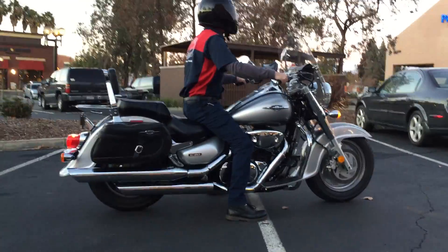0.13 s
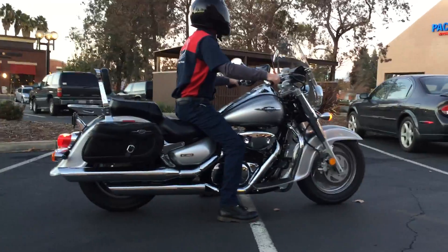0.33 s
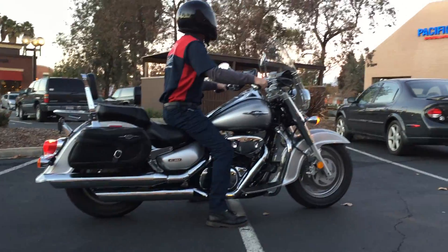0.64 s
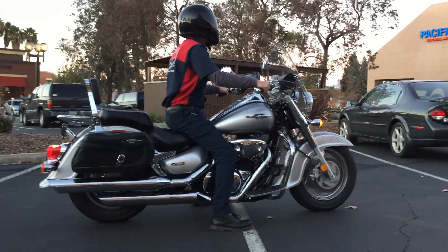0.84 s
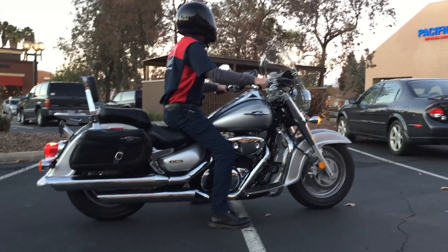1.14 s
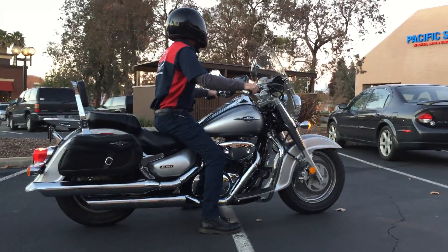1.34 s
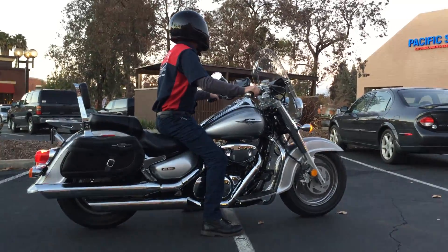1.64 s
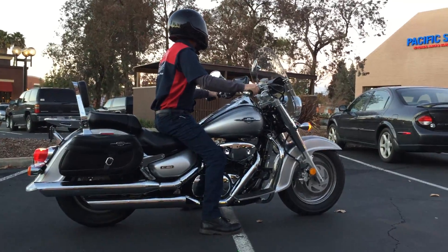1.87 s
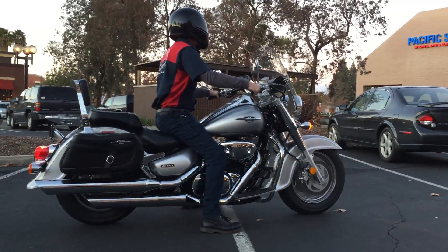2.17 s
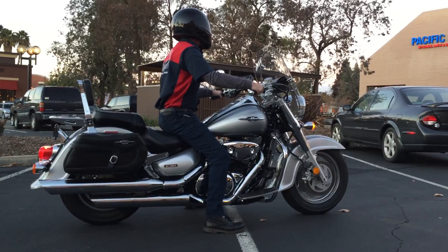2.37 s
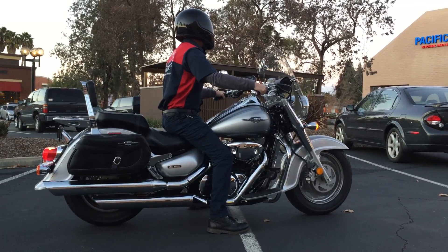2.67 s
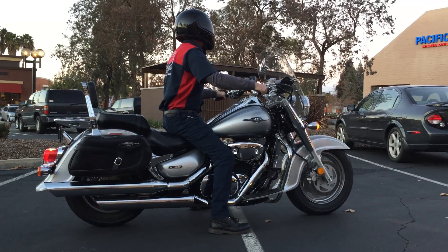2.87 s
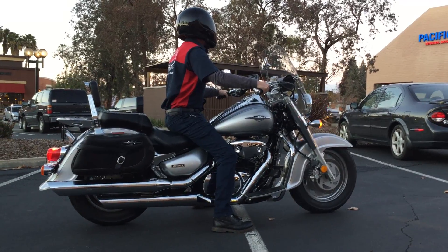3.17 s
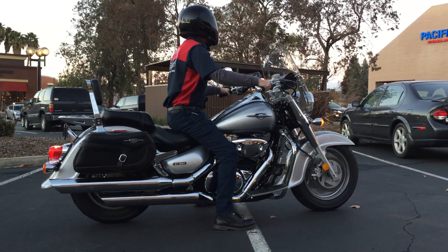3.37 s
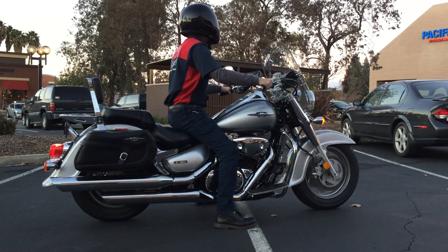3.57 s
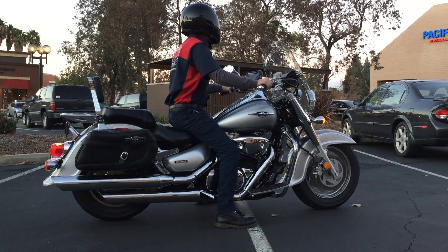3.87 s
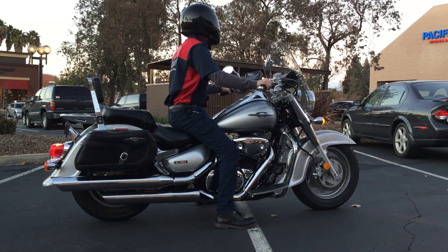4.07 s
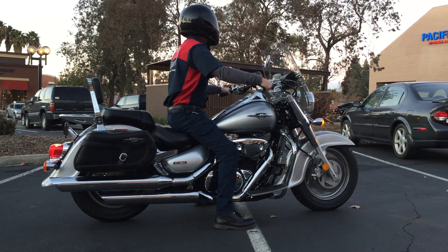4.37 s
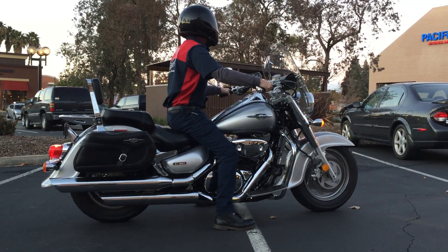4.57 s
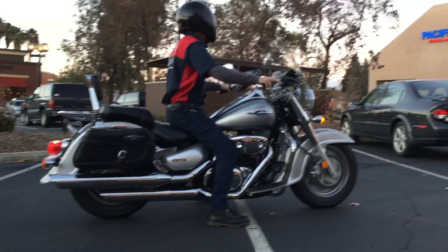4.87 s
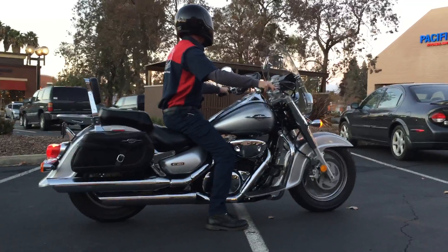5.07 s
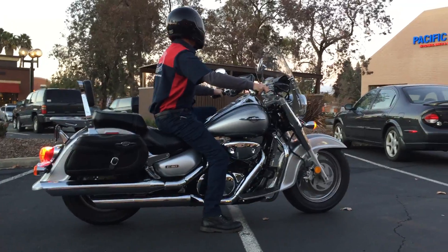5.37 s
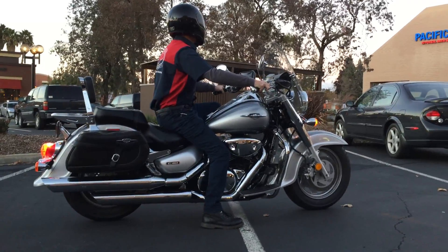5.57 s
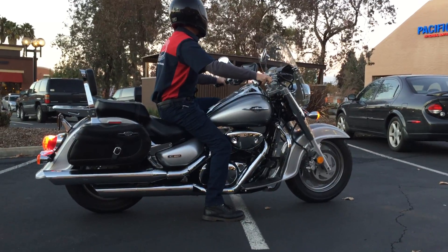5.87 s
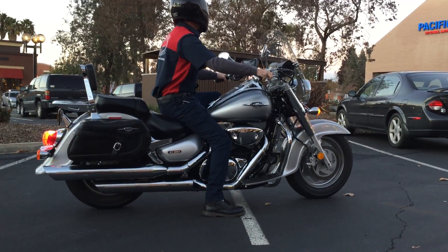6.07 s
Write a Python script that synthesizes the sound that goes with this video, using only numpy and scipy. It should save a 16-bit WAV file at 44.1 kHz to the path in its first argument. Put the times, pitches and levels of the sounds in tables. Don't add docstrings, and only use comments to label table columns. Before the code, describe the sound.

A big two-cylinder motorcycle idles with a deep uneven thump, then roars through two quick throttle blips, sputtering back down to idle in an open car park.

```python
import sys
import numpy as np
from scipy import signal
from scipy.fft import rfft, irfft
from scipy.io import wavfile
from scipy.ndimage import uniform_filter1d

SR = 44100
rng = np.random.default_rng(int(sys.argv[2]) if len(sys.argv) > 2 else 0)


def gain_from_decibels(decibels):
    exponent = np.asarray(decibels, float) / 20
    return 10 ** exponent


def store_pcm(level_fs):
    pcm = np.round(np.clip(level_fs, -1, 1) * 32767).astype(np.int16)
    wavfile.write(sys.argv[1], SR, np.atleast_2d(pcm).T)


N = 273861
T = np.arange(N) / SR
IDLE_HZ = 13.26


def unit(x):
    return x / np.sqrt(np.mean(x ** 2))


def ring(x, hz, t60):
    pole = np.exp(2j * np.pi * hz / SR - np.log(1000) / (t60 * SR))
    return signal.lfilter([1], [1, -pole], x).imag


def fade(x, t60):
    tail = signal.lfilter([1], [1, -np.exp(-np.log(1000) / (t60 * SR))], x)
    return uniform_filter1d(tail, size=300)


def coloured(points):
    hz, db = np.transpose(points)
    f = np.arange(N // 2 + 1) * SR / N + 1
    shape = gain_from_decibels(np.interp(np.log(f), np.log(hz), db))
    return unit(irfft(rfft(rng.standard_normal(N)) * shape, N))


def walk(rate):
    hold = int(SR / rate)
    steps = np.repeat(rng.standard_normal(N // hold + 1), hold)
    return unit(uniform_filter1d(uniform_filter1d(steps, hold), hold)[:N])


def clicks(s, size):
    inside = (s > 0) * (s < T[-1])
    return np.bincount(np.clip((s * SR).astype(int), 0, N - 1), size * inside, N)


def strokes(turns, at, scatter_db, jitter=0.005):
    late, strong = rng.standard_normal((2, 128))
    s = np.interp(np.arange(128) + at + jitter * late, turns, T, left=-1, right=99)
    return s, gain_from_decibels(scatter_db * strong)


# (time [s], four-stroke cycles per second [Hz])
ENGINE_SPEED = [(0, 12.606), (.31, 12.668), (.75, 13.246), (1.45, 12.905), (1.67, 13.669), (1.75, 16.336),
                (1.99, 34.604), (2.07, 32.754), (2.62, 18.051), (2.9, 15.018), (3.13, 14.163),
                (3.92, 13.68), (4.0, 16.276), (4.23, 36.073), (4.31, 36.564), (4.82, 21.905), (5.3, 14.562),
                (6.21, 13.668)]


def engine_speed():
    s, hz = np.transpose(ENGINE_SPEED)
    return np.interp(T, s, hz)


# (opens [s], eases [s], shut [s], load level [dB], intake roar level [dB])
BLIPS = [
    (1.639, 1.994, 2.05, 4, -31.5),
    (3.902, 4.195, 4.34, 5, -28.5),
]


def throttle():
    open_s, shut_s = 0.17, 0.041
    fill = np.array([np.interp(T, [a, a + open_s, b, c], [0, 1, 1, 0]) for a, b, c, _, _ in BLIPS])
    progress = sum(np.interp(T, [a, c - shut_s, c], [0, 1, 0]) for a, b, c, _, _ in BLIPS)
    load_db, roar_db = np.transpose(BLIPS)[3:]
    return fill.sum(axis=0), progress, gain_from_decibels(load_db) @ fill, gain_from_decibels(roar_db) @ fill ** 2.25


def strengths(speed, fill, load):
    relight_hz, relight_width_hz = 22.8, .7
    hot_hz, pump_full_hz = 18, 25
    excess = speed - relight_hz + (relight_hz - hot_hz) * fill
    lit = 1 / (1 + np.exp(excess / relight_width_hz))
    overrun = np.clip((speed - IDLE_HZ) / (pump_full_hz - IDLE_HZ), 0, 1)
    pump = overrun ** 0.86 * (1 - fill) ** 1.8
    idle = gain_from_decibels(1.5 + 9 * fill) * lit * (1 - 0.69 * pump)
    return np.array([idle, load, gain_from_decibels(-0.54) * pump * (1 - .55 * lit)])


# (frequency [Hz], density [dB per Hz])
TOWN_SPECTRUM = [(15, -18), (30, -16), (60, -29), (120, -19), (300, -33), (510, 3.5), (675, -9.5),
                 (1470, 0.5), (1850, -9), (2540, -17.5), (3590, -4), (5170, -22.5), (6310, -17),
                 (15700, -58)]


def town():
    return gain_from_decibels(-44 + walk(.7)) * coloured(TOWN_SPECTRUM)


# (frequency [Hz], bandwidth [Hz], level [dB])
CASE_MODES = [(393, 66, -9), (530, 93, -5), (710, 40, -22), (975, 86, -8.5), (1098, 53, -12.5),
              (1352, 58, -5), (1571, 35, 0), (1722, 94, -1.5), (1875.5, 32.4, 6.5), (2214, 48, -7),
              (2740, 6, -8.5), (3162, 44, -6), (3533, 213, -8.5), (3966, 133, -8), (4440, 250, -15),
              (6200, 420, -24.5), (7100, 400, -26)]
# (point in the cycle [cycles], level [dB])
VALVES = [
    (.05, -8),
    (.28, -6),
    (.52, -2),
    (.66, -8),
    (.87, 3),
]
# (time [s], level [dB])
SLACK = [
    (3.966, 13),
    (1.72, 2),
]


def cases(cycles):
    knocks = sum(gain_from_decibels(db) * clicks(*strokes(cycles, at, 2, jitter=.01)) for at, db in VALVES)
    s, slack_db = np.transpose(SLACK)
    chatter = .52 + fade(knocks + clicks(s, gain_from_decibels(slack_db)), .07)
    out = 0
    for hz, width, db in CASE_MODES:
        sharp = chatter ** (1 + .5 * (hz > 3000))
        mode = unit(ring(sharp * rng.standard_normal(N), hz, 2.4 / width))
        out = out + gain_from_decibels(db + .6 * walk(14)) * np.sqrt(width) * mode
    return unit(out)


# (frequency [Hz], density [dB per Hz])
GAS_SPECTRUM = [(190, -1), (330, -3.5), (650, -9.5), (717, -2.5), (802, -12.5), (943, -4), (1020, -12.5),
                (1830, -5.5), (2050, -10.5), (2610, -17.5), (3170, -12.5), (4100, -12.5), (5060, -16.5),
                (5950, -15.5), (15700, -24.5)]
# (time [s], peak level [dB], t60 [s])
SPITS = [(2.4543, -24, 0.06), (2.473, -27.5, 0.14), (2.5202, -23.5, 0.046), (2.5494, -27, 0.15),
         (2.605, -21, 0.047), (2.6244, -29, 0.055), (2.6823, -28, 0.054), (2.7921, -29, 0.072),
         (2.8484, -43, 0.06), (2.9294, -31, 0.074), (2.9811, -37, 0.05), (3.0694, -37, 0.06),
         (4.733, -26, 0.054), (4.8479, -31, 0.055), (4.8683, -26, 0.058), (4.915, -24.5, 0.058),
         (5.02, -25.5, 0.056), (5.074, -27, 0.06), (5.19, -27.5, 0.081), (5.2494, -42, 0.06),
         (5.3194, -30, 0.079)]


def gas(cycles, hiss_db, growl_db):
    puffs = sum(clicks(*strokes(cycles, at, 1.8, jitter=0.078)) for at in (.55, .85))
    flow = unit(.9 + fade(puffs, .06)) * gain_from_decibels(hiss_db + 7 + .7 * walk(25))
    spits = sum(fade(clicks(np.array([s]), gain_from_decibels([db - 4])), t60) for s, db, t60 in SPITS)
    size = np.sqrt(flow ** 2 + spits ** 2)
    noise = coloured(GAS_SPECTRUM)
    top = signal.sosfiltfilt(signal.butter(2, 11900, "high", fs=SR, output="sos"), noise)
    low = signal.sosfiltfilt(signal.butter(2, 990, fs=SR, output="sos"), noise)
    brightness = (size / gain_from_decibels(-24)) ** 0.08
    return size * (noise + low * (gain_from_decibels(growl_db) - 1) + top * (brightness - 1))


# (frequency [Hz], t60 [s], signed share of first cylinder, of second)
LOAD_MODES = [(56.6, .15, -.27, .12), (62.7, .079, .38, -.03), (103, .084, -.11, -.11),
              (128, .06, -.115, -.12), (163.8, .13, .06, .11), (198, .053, .22, .145),
              (233, .029, -.19, .07), (268, .038, -.055, -.095), (363, .02, .1, .03)]


def turbulence(fired):
    eddies = rng.standard_normal(N) * (0.9 + fade(fired, 0.075))
    return unit(sum(abs(share) * hz * ring(eddies, hz, t60) for hz, t60, share, _ in LOAD_MODES))


# (frequency [Hz], t60 [s], signed share of first cylinder, of second)
IDLE_MODES = [(60.14, 0.39, -0.065, -0.13), (70.2, 0.084, 0.18, 0.36), (103.7, 0.2, -0.051, -0.092),
              (121.5, 0.17, 0.021, 0.026), (139.8, 0.13, -0.047, -0.096), (152.2, 0.33, -0.035, -0.0036),
              (156.4, 0.023, 0.033, 0.11), (253.6, 0.041, 0.051, 0.053), (272.8, 0.12, -0.034, -0.0282)]
# (frequency [Hz], t60 [s], signed share of first, of second)
PUMP_MODES = [(51, .09, -.075, -.12), (73, .09, .3, .33), (106.8, .09, -.242, -.341),
              (135, .07, -.034, -.038), (172.5, .083, .105, .092), (196, .053, .044, .086),
              (247, .08, -.005, -.055), (285, .06, -.039, .03), (320, .064, -.01, -.023)]
# (time [s], level [dB])
MISFIRES = [(.281, -16), (2.785, -5), (2.85, 4), (2.916, -8), (2.984, 2), (3.053, -12), (5.05, -6),
            (5.18, -8), (5.243, 3), (5.307, -18), (5.374, 2)]
# (time [s], level [dB], frequency [Hz], t60 [s])
AFTERFIRE = (5.329, -11, 118, .12)


def exhaust(turns, levels_db):
    out, fired = 0, 0
    for k in range(2):
        s, size = strokes(turns, .36 * k, .7, jitter=.002)
        for when, db in MISFIRES:
            size = size * gain_from_decibels(db * k * (abs(s - when) < .02))
        fire = clicks(s, size)
        fired = fired + fire
        for modes, db in zip((IDLE_MODES, LOAD_MODES, PUMP_MODES), levels_db):
            blow = fire * gain_from_decibels(db)
            out = out + sum(mode[2 + k] * ring(blow, mode[0], mode[1]) for mode in modes)
    when, db, hz, t60 = AFTERFIRE
    return out + ring(clicks(np.array([when]), gain_from_decibels([db])), hz, t60), fired


def power_sum_db(a, b):
    return 10 * np.log10(a ** 2 + b ** 2)


def scene():
    speed = engine_speed()
    cycles = np.cumsum(speed) / SR
    above_idle = speed - IDLE_HZ
    fill, progress, load, roar = throttle()
    hiss_db = power_sum_db(gain_from_decibels(-51 + 0.8361 * above_idle), roar * gain_from_decibels(-1.5 * progress))
    knock = gain_from_decibels(-27) * fill ** 2 * (1 - progress)
    rattle_db = power_sum_db(gain_from_decibels(-37 + 0.217 * above_idle), 2 * knock)
    gains = strengths(speed, fill, load)
    pipes, fired = exhaust(cycles - .21 + .167 * progress, 20 * np.log10(gains + 0.016))
    growl_db = 2 * fill - 3.5 * np.sqrt(gains[2])
    eddy_db = .7 * hiss_db - 2 + growl_db
    engine = pipes + gain_from_decibels(eddy_db) * turbulence(fired) + gain_from_decibels(rattle_db) * cases(cycles)
    engine = engine + gas(cycles, hiss_db, growl_db)
    return (engine + town())[None]


def band_limit(x):
    return signal.sosfilt(signal.butter(12, 15830, fs=SR, output="sos"), x)


def record(dry):
    x = signal.sosfiltfilt(signal.butter(2, 38, "high", fs=SR, output="sos"), dry)
    x = .5 * (x + signal.lfilter(*signal.iirnotch(10500, 8, fs=SR), x))
    return band_limit(np.tanh(1.446 * x) / 1.222)


dry = scene()
out = record(dry)
store_pcm(out)
```